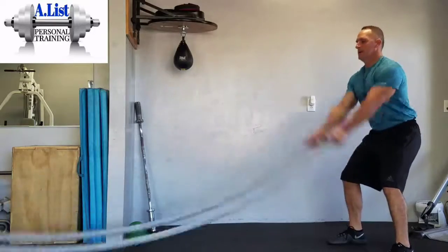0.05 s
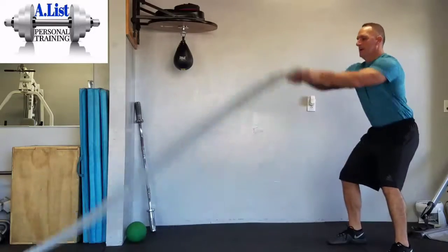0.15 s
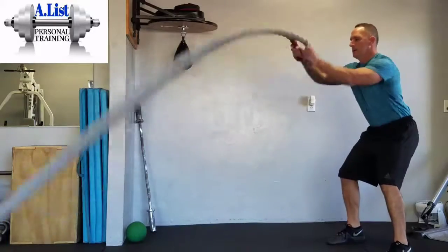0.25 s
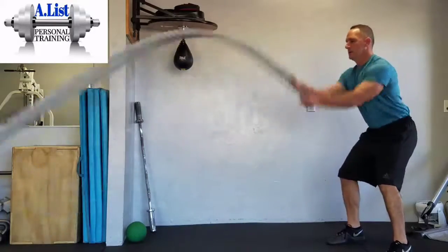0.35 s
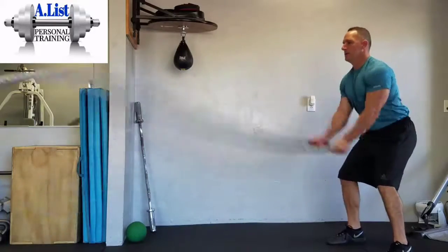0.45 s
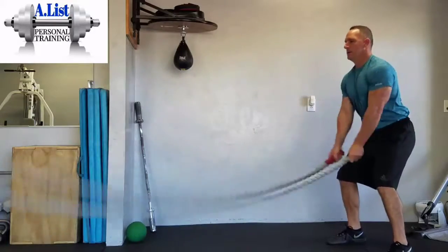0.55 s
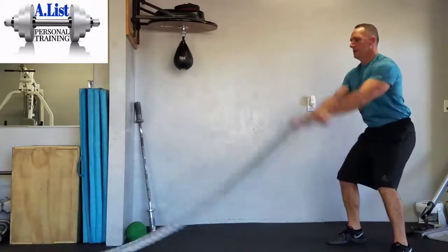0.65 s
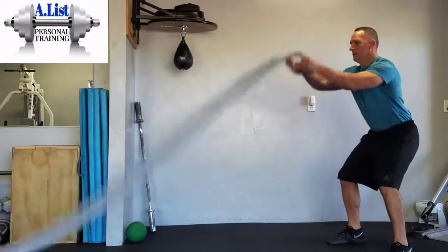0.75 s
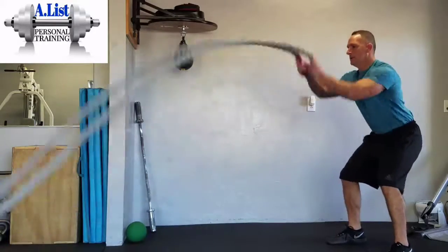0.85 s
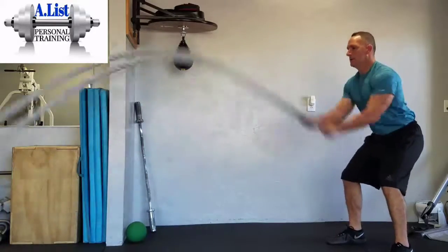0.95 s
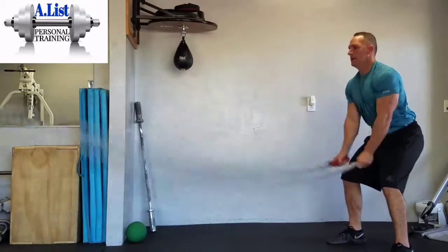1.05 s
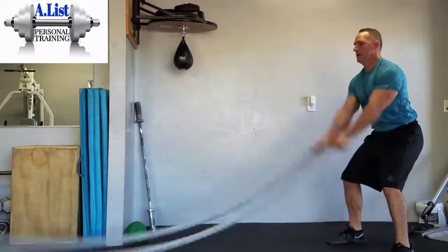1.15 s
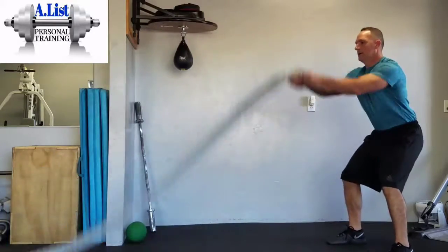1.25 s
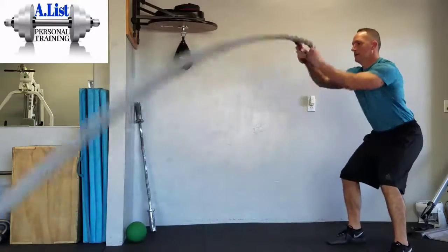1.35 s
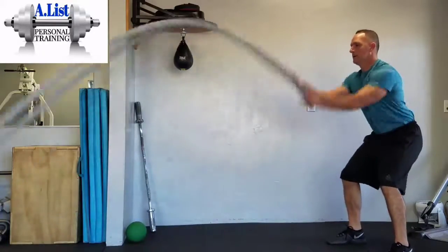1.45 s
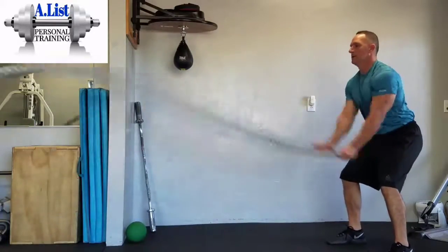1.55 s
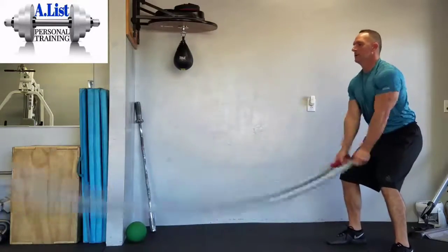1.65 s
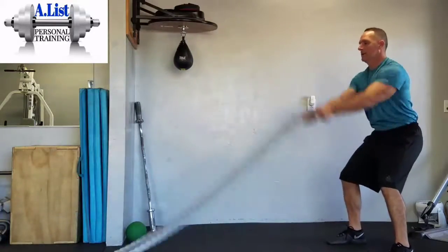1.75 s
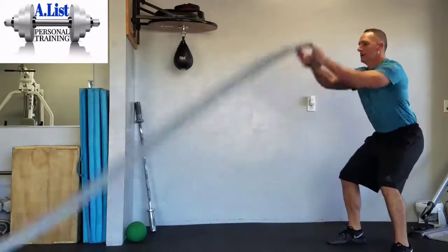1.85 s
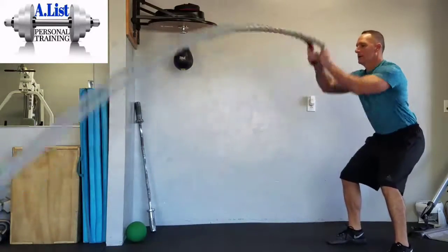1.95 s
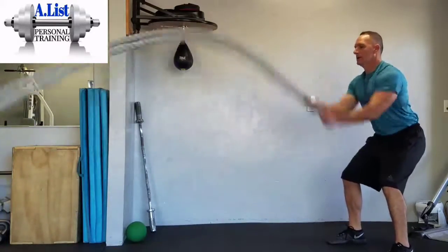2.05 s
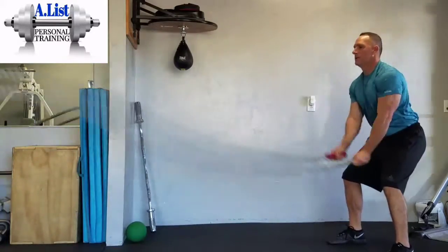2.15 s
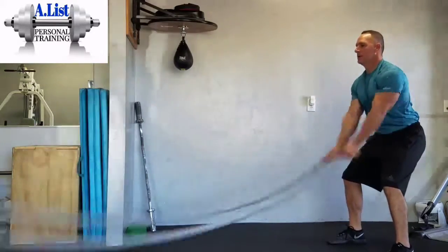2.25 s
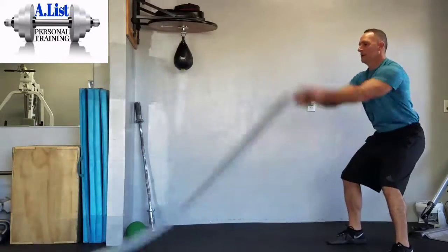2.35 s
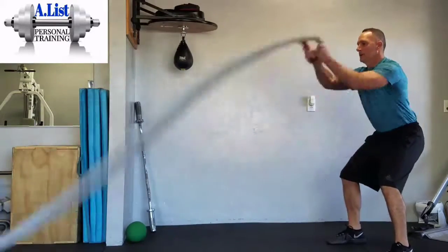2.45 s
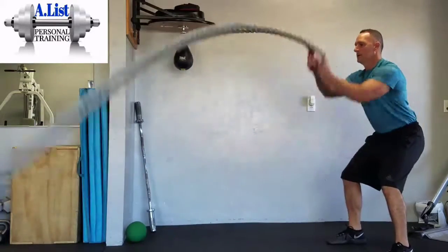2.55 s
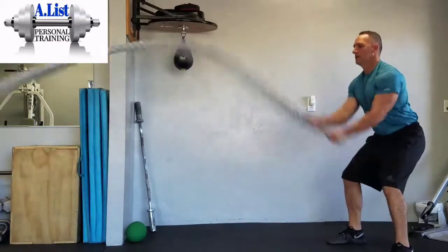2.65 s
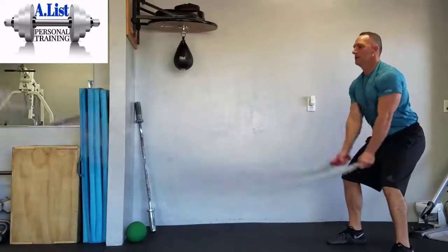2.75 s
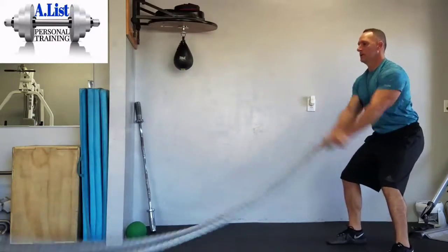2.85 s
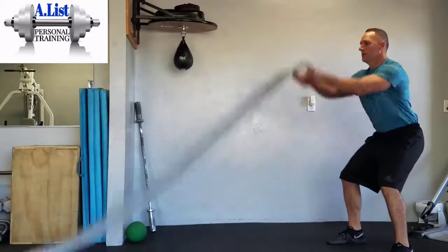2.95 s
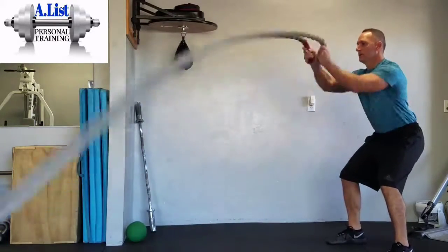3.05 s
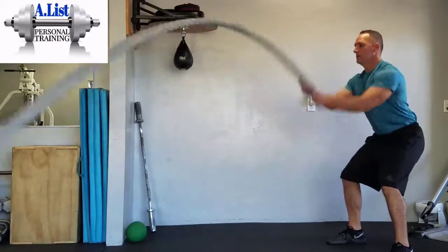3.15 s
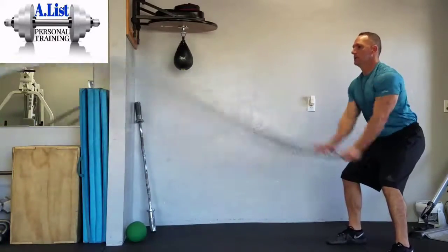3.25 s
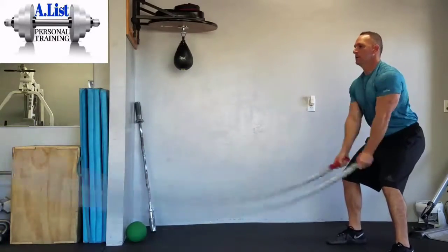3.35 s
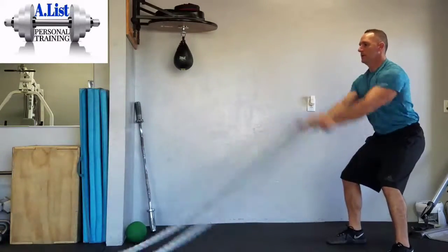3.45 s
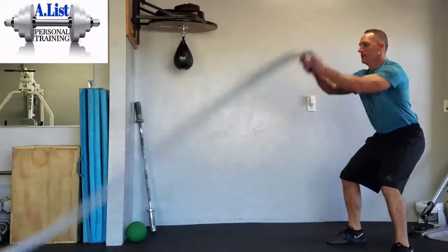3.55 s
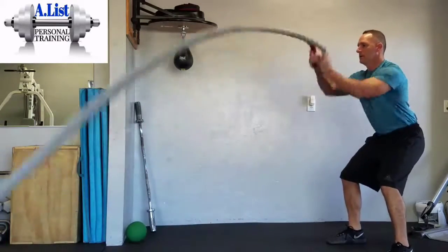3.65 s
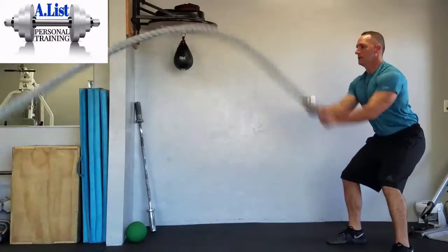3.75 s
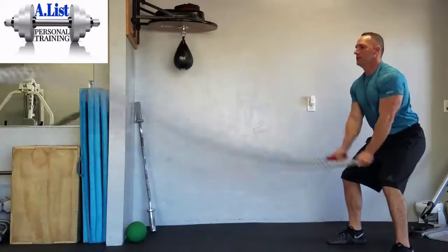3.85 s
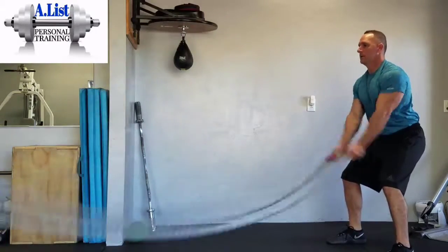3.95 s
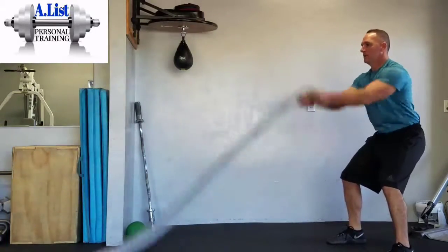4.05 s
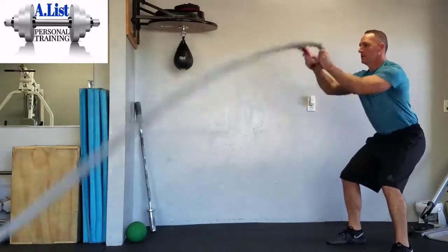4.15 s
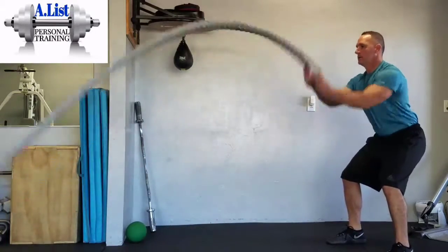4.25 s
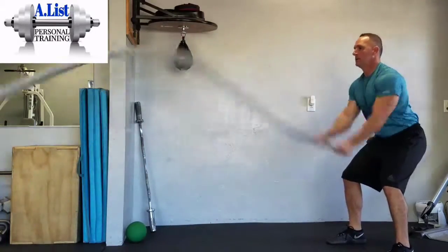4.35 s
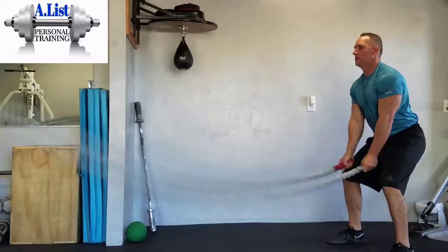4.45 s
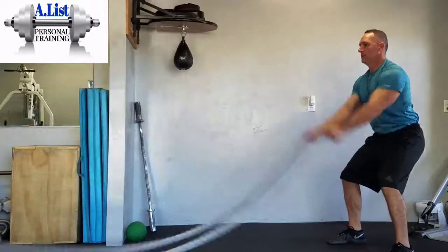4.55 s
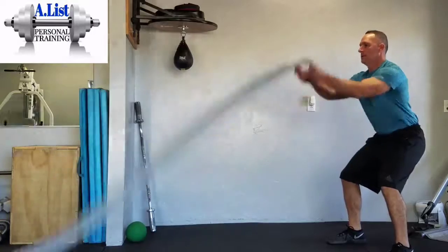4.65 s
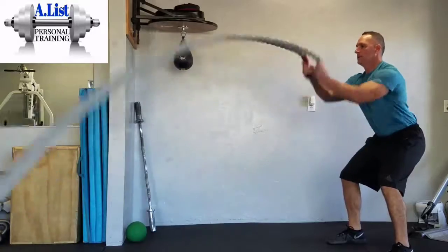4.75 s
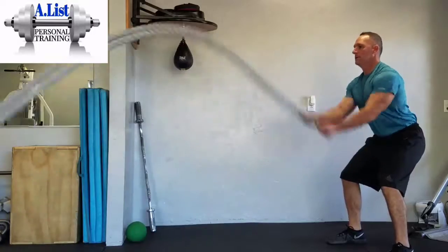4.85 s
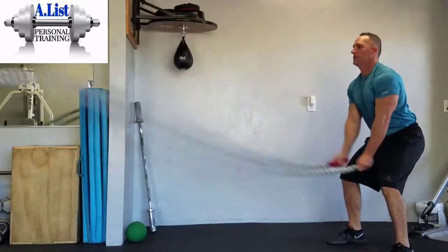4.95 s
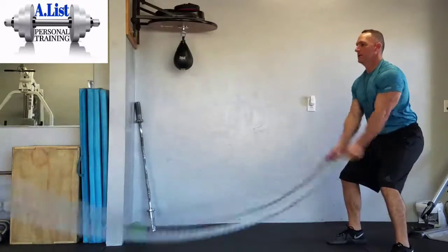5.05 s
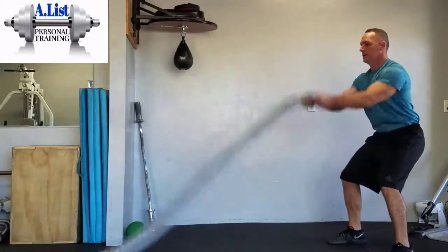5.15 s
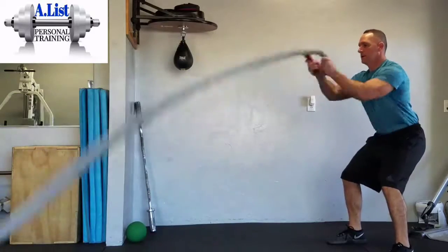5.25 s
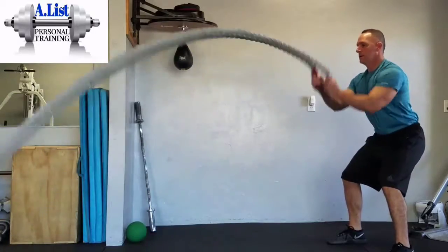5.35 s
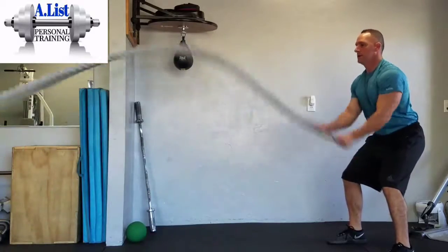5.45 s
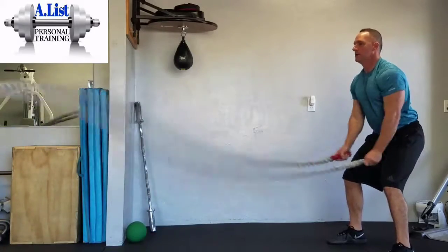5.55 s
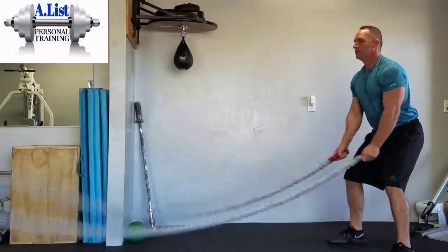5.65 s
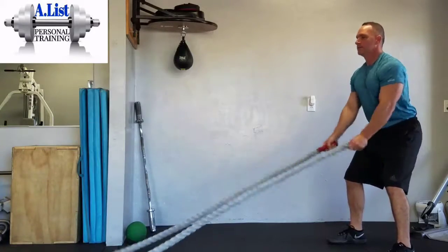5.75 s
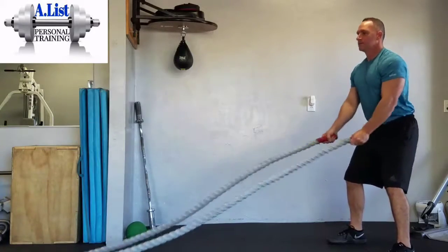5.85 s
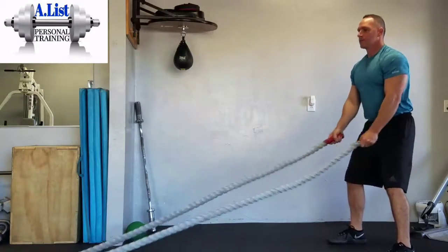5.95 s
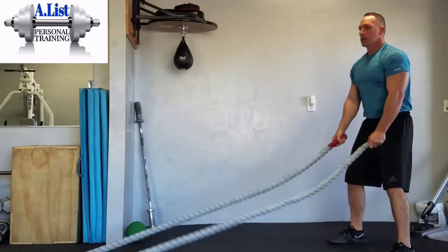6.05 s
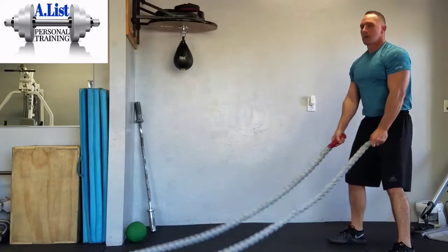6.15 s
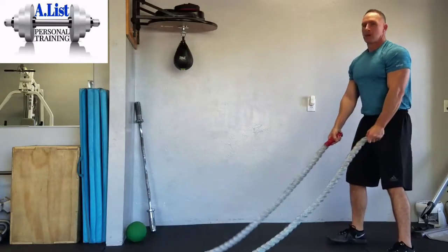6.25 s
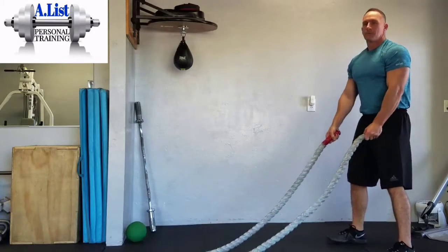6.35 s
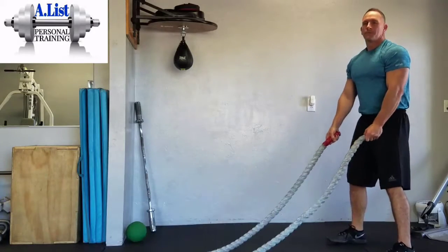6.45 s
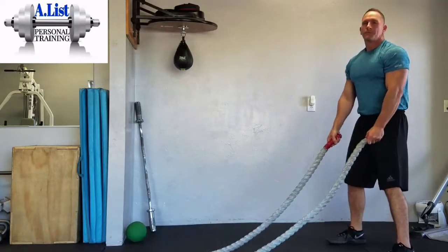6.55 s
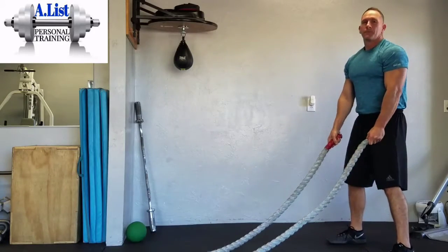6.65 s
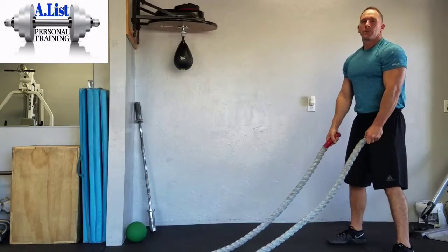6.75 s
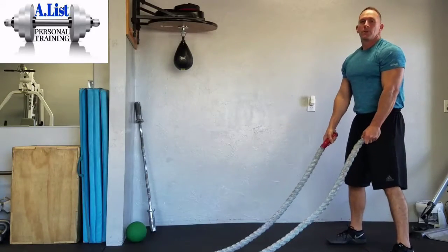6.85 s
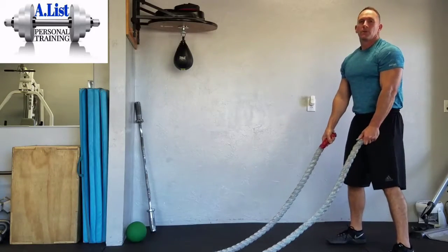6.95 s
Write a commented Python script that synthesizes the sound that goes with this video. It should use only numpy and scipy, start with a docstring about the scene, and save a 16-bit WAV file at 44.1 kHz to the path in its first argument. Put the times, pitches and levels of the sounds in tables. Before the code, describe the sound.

Eleven steady, overloaded rope slams thump and echo in a small bare gym, with softer slack flops and faint brushing between them.

```python
"""Two heavy ropes slam onto the rubber floor of a small bare gym; after each wave the slack flops down more softly.
A blow is a run of random contacts shaped by a colour filter; each slam carries a short low thump, as from an
overloaded input. The room answers with decaying noise echoes. Filtered noise makes the brushing swishes, a soft
rush that comes and goes, and the ventilation rumble; a few small knocks are damped rings. Loud peaks bend and clip.
"""
import sys
import numpy as np
from scipy import signal
from scipy.fft import rfft, irfft
from scipy.io import wavfile
from scipy.ndimage import uniform_filter1d

SR = 44100
rng = np.random.default_rng(int(sys.argv[2]) if len(sys.argv) > 2 else 0)


def inscribe(sig):
    """Save sig as 16-bit PCM at rate SR to the path in sys.argv[1].

    A 1-D sig is mono; a 2-D sig holds one channel per row.
    Samples are clipped to [-1, 1] before scaling.
    """
    pcm = np.round(np.clip(np.atleast_2d(sig).T, -1, 1) * 32767)
    wavfile.write(sys.argv[1], SR, pcm.astype(np.int16))


N = 308700  # 7 s of samples

# Rope waves hitting the floor. Blow levels are before the room, with the energy counted over 1 ms:
# [t/s, first rope level/dB, second rope delay t/s, second rope level/dB, hardness -1 to 1,
#  weight dB per octave below 300 Hz, level/dB of the brushing hiss that follows]
WAVES = [(0.2282, 0.5, .0101, -6.5, -0.26, 2.8, -51), (0.7451, -1, .012, -3.5, -0.073, -0.7, -57),
         (1.2892, -1, .0102, -5, -0.084, 2, -52.5), (1.8395, 0.5, .0054, -4.5, 0.042, 0.5, -50),
         (2.3948, -1.5, .0141, -2.5, 0.062, -1.1, -47), (2.9738, -1.5, .0127, -4, -0.023, 0.5, -48.5),
         (3.5432, -1, .006, -0.5, -0.022, 1, -43), (4.1115, -2, .0098, -3, .3, .3, -50),
         (4.6667, -2.5, .0106, -4, .1, -3.5, -45), (5.2285, -0.7, .0049, -2.5, -0.15, 2, -41.5),
         (5.8155, 0, .0273, -2, -0.27, -1.6, -54)]
# Tone of a slam: [f/Hz, relative level/dB]
SLAM_COLOUR = [(18, -60.5), (30, -30.5), (113, -25.5), (205, -6.5), (312, -4), (524, -2), (859, -4),
               (1170, -4.5), (1440, -15), (2430, -25), (3590, -37.5), (8040, -46.5), (9150, -58.5),
               (15000, -58.5)]
# Each pair: value of an average landing, change at full hardness
SLAM_ROLL_S, SLAM_LEAD_DB, SLAM_BRIGHT_DB = (.021, -.002), (9.5, -3), (0.25, 2)


def slam_landings():
    """Each wave brings down two ropes, the second a few milliseconds after the first."""
    rows = []
    for s, first_db, delay, second_db, hardness, weight_db, _ in WAVES:
        rows.append((s, first_db, hardness, weight_db))
        rows.append((s + delay, second_db, hardness, weight_db))
    return landings(rows, SLAM_ROLL_S, SLAM_LEAD_DB, SLAM_BRIGHT_DB)


def slams(rows):
    """The ropes strike the floor: the run of contacts swells quickly, with a strong first press."""
    return blows(rows, SLAM_COLOUR, lead_s=0.00164, crack_db=-14.5, rise=0.085, places=4)


THUMP_DB, THUMP_HZ, THUMP_S = -24.5, 55, 0.0087  # level against the blow, pitch, decay time


def thumps(rows):
    """Each slam carries a short low thump, as from an overloaded input, alike in both channels."""
    out, t = np.zeros(N + SR), np.arange(4096) / SR
    swing = np.sin(2 * np.pi * THUMP_HZ * t) * np.exp(-t / THUMP_S)
    for s, blow_db, *_ in rows:
        i = int(s * SR)
        out[i:i + len(t)] -= undb(blow_db + THUMP_DB) * swing
    return out[:N]


# Slack falling back; levels as for the waves:
# [t/s, level/dB, hardness -1 to 1, weight dB per octave below 300 Hz]
FLOPS = [(.364, -8, -0.38, -2.5), (.936, -14, -0.61, 0), (.966, -11, 0.0076, 0.5),
         (1.476, -15, -0.088, 5.5), (1.509, -10.5, 0.34, -4), (2.045, -7.5, 0.1, -1.3),
         (2.579, -13, -0.72, 0.5), (2.62, -17, -0.39, -4), (3.171, -13.5, -0.33, 2),
         (3.741, -10.5, -0.45, 0.5), (3.766, -6, .7, -2.5), (3.785, -6.5, .4, -10), (3.799, -17.5, 0.57, 2),
         (4.311, -13.5, -0.95, -5), (4.352, -17, 0.56, 4), (4.867, -13, -0.66, -1), (4.910, -4, 0.51, -4),
         (5.405, -14.5, -0.89, -8), (5.455, -6.5, 0.54, 2.5), (5.478, -28, 0.43, 4.5),
         (5.964, -4.5, -0.028, -2.7), (5.999, -19.5, -0.24, 4.5), (6.262, -28.5, -0.97, 6.5),
         (6.295, -50, -0.71, 2)]
# Tone of a flop: [f/Hz, relative level/dB]
FLOP_COLOUR = [(18, -73.5), (30, -43), (53, -31), (102, -13.5), (253, -1.5), (304, 1.5), (662, -2),
               (1200, -13), (1440, -24), (2920, -38), (3320, -49.5), (7830, -60), (15000, -95)]
# Each pair: value of an average landing, change at full hardness
FLOP_ROLL_S, FLOP_LEAD_DB, FLOP_BRIGHT_DB = (.015, -.006), (3.5, 6.5), (-0.24, 4)


def flops():
    """The slack drops back: the contacts swell more gradually and hardly crack."""
    rows = landings(FLOPS, FLOP_ROLL_S, FLOP_LEAD_DB, FLOP_BRIGHT_DB)
    return blows(rows, FLOP_COLOUR, lead_s=.0013, crack_db=-39.5, rise=0.38, places=4)


def landings(rows, *rules):
    """Hardness sets three things at once: rolling time, first contact and brightness."""
    full_rows = []
    for s, blow_db, hardness, weight_db in rows:
        hardness = np.clip(hardness, -1, 1)
        roll, lead_db, bright_db = [mean + change * hardness for mean, change in rules]
        full_rows.append((s, blow_db, roll, lead_db, bright_db, weight_db))
    return full_rows


def blows(rows, colour, lead_s, crack_db, rise, places, count=50):
    """The rope rolls down onto the floor: a first broad contact, then a fading run of uneven ones."""
    out, hz = np.zeros((places, N + SR)), np.fft.rfftfreq(4096, 1 / SR)
    octaves = np.log2(np.clip(hz, 60, 8000) / 300)
    # the first contact presses in slowly and lets go fast
    lead = np.sin(np.pi * np.linspace(0, 1, int(lead_s * SR) + 3) ** 1.82) ** 2
    lead = lead / lead.sum()
    lead[len(lead) * 2 // 3] -= undb(crack_db)  # fibres crack as the rope flattens
    for k, (s, blow_db, roll, lead_db, bright_db, weight_db) in enumerate(rows):
        when, size = rng.random((2, count))
        roll = np.clip(roll, .002, .1)
        lag = 3 * roll * when
        swell = (1 - np.exp(-lag / max(rise * roll, 1e-4))) * np.exp(-lag / roll)
        contacts = swell * (2 * size - 1) ** 3  # the cube makes most contacts small, a few large
        push = np.zeros(int(.32 * SR))
        np.add.at(push, (lag * SR).astype(int), contacts)
        push /= np.sqrt(np.sum(push ** 2))
        push[:len(lead)] -= undb(lead_db) * lead
        # brightness tilts the tone above 300 Hz, weight tilts it below
        tilt_db = np.where(octaves > 0, bright_db, -weight_db) * octaves
        body = causal(read(colour, hz) + tilt_db)
        sound = signal.fftconvolve(push, body)
        sound *= np.sqrt(SR / 1000 / np.sum(sound ** 2))  # energy of 1 ms at rms 1
        i = int(s * SR)
        out[k % places, i:i + len(sound)] += undb(blow_db) * sound  # take the places in turn
    return out[:, :N]


# Brushing hiss: [f/Hz, relative level/dB]
SWISH_COLOUR = [(600, -21), (1500, 1), (3000, -7.5), (8000, -17.5), (9500, -24), (15000, -18)]
SWISH_AFTER_S, SWISH_S = .22, 0.098  # swell centre after each wave, length setting
DRAG_AT_S, DRAG_DB, DRAG_S = 6.2, -55.5, 0.47  # the last, longer swell


def swish():
    """Fibres brush the mat as slack lifts after each wave, and once as the ropes are laid to rest."""
    t = np.arange(N) / SR
    rows = [(wave[0] + SWISH_AFTER_S, wave[-1], SWISH_S) for wave in WAVES]
    rows.append((DRAG_AT_S, DRAG_DB, DRAG_S))
    swell = np.zeros(N)
    for s, db, length in rows:
        phase = np.clip((t - s) / length / 1.54, -.5, .5)  # a swell lasts 1.54 lengths in all
        swell += undb(db) * np.cos(np.pi * phase) ** 2
    return swell * undb(3.8 * walk(25)) * hiss(SWISH_COLOUR)


# Small knocks as things settle, with peak level before the room:
# [t/s, level/dB, pitch f/Hz, resonance width f/Hz, scrape time t/s]
KNOCKS = [(6.576, -37.5, 228, 91, 0.00205), (6.578, -47.5, 972.2, 250, 0.0027),
          (6.854, -43.5, 2070, 1450, 0.0037)]


def knocks():
    """A brief scrape of noise sets off a damped ring."""
    out, t = np.zeros(N), np.arange(2048) / SR
    for s, db, hz, width, scrape in KNOCKS:
        rub = rng.standard_normal(2048) * t * np.exp(-t / scrape)
        ring = t * np.sin(2 * np.pi * hz * t) * np.exp(-np.pi * width * t)
        sound = np.convolve(rub, ring)
        i = int(s * SR)
        out[i:i + len(sound)] += undb(db) * sound / np.max(np.abs(sound))
    return out


# How long the echoes take to fade by 60 dB: [f/Hz, fade t/s]
ROOM_T60 = [(60, 0.12), (130, 0.55), (260, 0.48), (700, .42), (1800, 0.55), (5000, 0.56), (12000, 0.56)]
FLUTTER_S, FLUTTER_DB = .0049, -9.5  # spacing of slap-backs between near surfaces, change at each turn
DIRECT_DB = 5.  # straight path, against the level that feeds the slap-backs


def room(x, wet_db=-21.5, build_s=0.0037, early=0.15, early_s=0.091, clump_db=1.5):
    """Direct sound, a short flutter and dense echoes that come in clumps and die away band by band."""
    t = np.arange(SR) / SR
    hz, noise = stereo_noise(SR)
    echo, clumps = np.zeros((2, SR)), undb(clump_db * walk(120.1)[:SR])
    for centre in 40 * 2 ** np.arange(0, 9, .5):
        distance = np.log2(np.maximum(hz, 1) / centre)  # in octaves
        band = np.cos(np.pi * np.clip(distance, -.5, .5)) ** 2
        fade = 1000. ** (-t / max(read(ROOM_T60, centre), .05))
        tail = irfft(noise * band) * fade * clumps
        wanted = np.mean(band ** 2) * np.sum(fade ** 2)  # energy of this band
        echo += tail * np.sqrt(wanted / np.sum(tail ** 2, axis=1, keepdims=True))
    echo *= undb(wet_db) * (1 - np.exp(-t / build_s))
    echo *= 1 + early * np.exp(-t / early_s)  # the nearest walls add strength to the early echoes
    echo[:, 0] += undb(DIRECT_DB) - 1  # turn 0 of the flutter supplies the remaining 1
    turn = np.arange(8)
    echo[:, (turn * FLUTTER_S * SR).astype(int)] += undb(turn * FLUTTER_DB)
    return signal.fftconvolve(x[None], echo)[:, :N]


# Level of the soft rush over time: [t/s, level/dB]
WHOOSH = [(0, -46.5), (.3, -40.5), (.7, -46.5), (2, -52), (3.399, -52.5), (4.1, -49), (5.698, -50),
          (6.3, -82.5), (6.8, -53.5), (7, -54)]
# Its tone: [f/Hz, relative level/dB]
WHOOSH_COLOUR = [(80, -16.5), (200, 1), (600, -9), (1600, -9), (3000, -25.5), (6000, -36)]


def whoosh():
    """A soft mid-band rush of noise comes and goes, with small random wavers."""
    level_db = np.interp(np.arange(N) / SR, *np.transpose(WHOOSH))
    return undb(level_db + 2.8 * walk(14)) * hiss(WHOOSH_COLOUR)


# Tone of the ventilation rumble: [f/Hz, relative level/dB]
AIR_COLOUR = [(18, -37.5), (30, -11.5), (113, -1), (346, -16), (404, -19.5), (612, -19.5), (698, -17.5),
              (2080, -22), (3410, -38.5), (9150, -45.5), (13900, -61), (15000, -56)]
AIR_DB = -46.5  # level around which the rumble wavers


def ventilation():
    """Moving air makes a steady, mostly deep noise whose level wavers slightly."""
    return undb(AIR_DB + 1.1 * walk(14.0)) * hiss(AIR_COLOUR)


def hiss(colour):
    """Stereo noise of a given colour, rms 1."""
    hz, noise = stereo_noise(N)
    x = irfft(noise * undb(read(colour, hz)), N)
    return x / np.sqrt(np.mean(x ** 2))


# How alike left and right are: [f/Hz, correlation -1 to 1]
LIKENESS = [(30, 0.81), (60, 0.8), (125, 1), (250, 0.73), (500, 0.49), (1000, -0.22), (2000, -0.11),
            (8000, 0.023)]


def stereo_noise(size):
    """Left and right noise spectra, mixed from a shared and an opposed part to set their likeness."""
    hz = np.fft.rfftfreq(size, 1 / SR)
    likeness = np.clip(read(LIKENESS, hz), -1, 1)
    mid, side = rfft(rng.standard_normal((2, size)))
    mid = mid * np.sqrt((1 + likeness) / 2)
    side = side * np.sqrt((1 - likeness) / 2)
    return hz, np.array([mid + side, mid - side])


def walk(rate):
    """A wandering level: random steps, each 1 / rate s long, smoothed twice."""
    k = int(SR / rate)
    steps = np.repeat(rng.standard_normal(N // k + 1), k)
    return uniform_filter1d(uniform_filter1d(steps, k), k)[:N]


def causal(db):
    """The filter that answers as early as it can with these gains in dB, scaled to unit energy."""
    ceps = irfft(db * np.log(10) / 20)
    half = len(ceps) // 2
    ceps[1:half] *= 2  # fold the mirrored half forward in time
    ceps[half + 1:] = 0
    h = irfft(np.exp(rfft(ceps)))[:half]
    return h / np.sqrt(np.sum(h ** 2))


def read(table, hz):
    """Value of a (f/Hz, value) table on a log-frequency axis."""
    f, v = np.transpose(table)
    return np.interp(np.log(np.maximum(hz, 1)), np.log(f), v)


def undb(db):
    """Gain of a level in dB."""
    return 10 ** (np.asarray(db) / 20)


def scene():
    """Ropes and knocks in the room, over the background; each landing place excites other echoes."""
    slam_rows = slam_landings()
    ropes = slams(slam_rows) + flops()
    ropes_in_room = sum(room(place) for place in ropes)
    knocks_in_room = room(knocks(), wet_db=-28.5)
    return ropes_in_room + thumps(slam_rows) + swish() + knocks_in_room + whoosh() + ventilation()


# Channel balance: [f/Hz, left minus right level/dB]
BALANCE_DB = [(60, 0.5), (110, -2), (200, 1), (380, 0.5), (700, 2), (1290, 1), (2380, -2), (4400, -2.5),
              (8120, -1.5), (15000, -4)]
TOP_HZ = 14900  # highest frequency let through


def record(dry):
    """Two unequal channels; the capsule bends on loud peaks, the input clips, the top is cut."""
    tilt = read(BALANCE_DB, np.fft.rfftfreq(N, 1 / SR)) / 2
    x = irfft(rfft(dry) * undb([tilt, -tilt]), N)
    x = x - 0.049 * np.minimum(x ** 2, 4)  # uneven swing leaves a low dip under each overload
    x = np.clip(x, -.995, .995)
    top_cut = signal.ellip(8, .02, 60, TOP_HZ, fs=SR, output="sos")
    return signal.sosfilt(top_cut, x)


dry = scene()
out = record(dry)
inscribe(out)
```